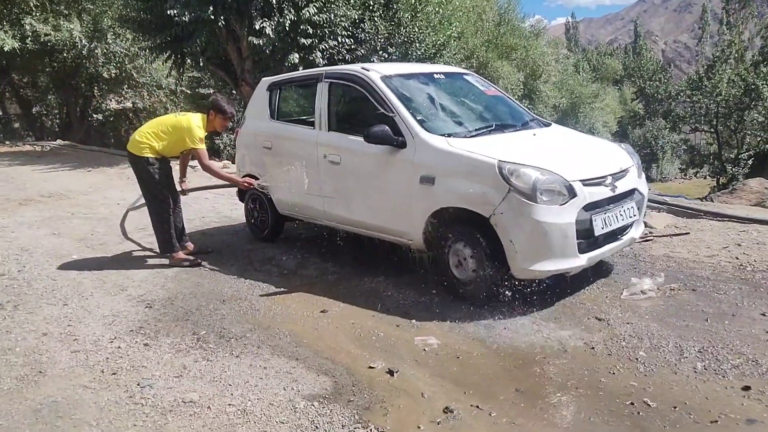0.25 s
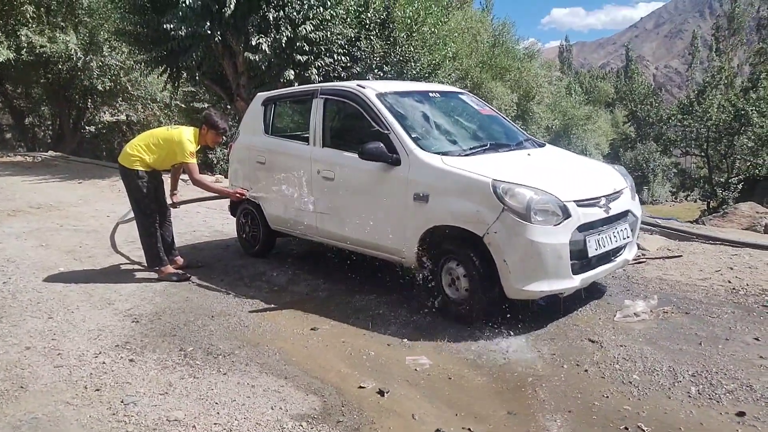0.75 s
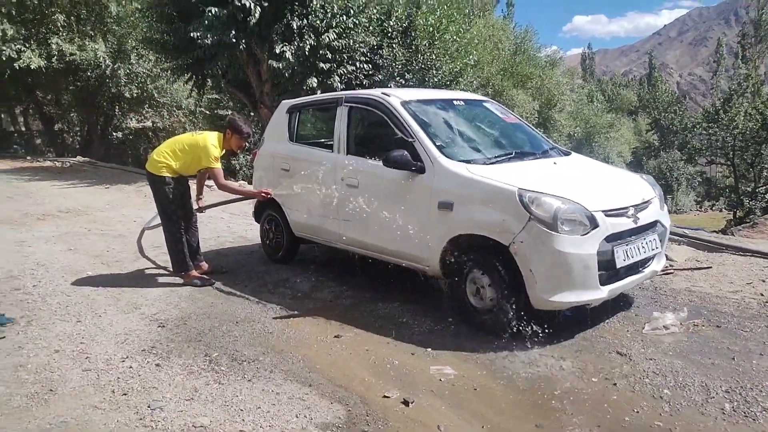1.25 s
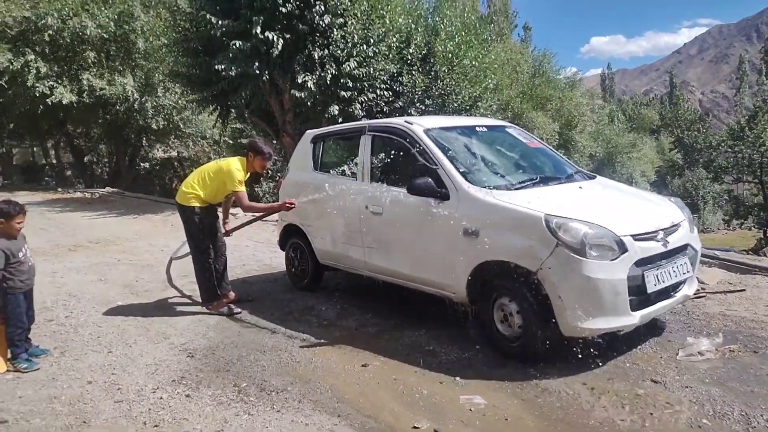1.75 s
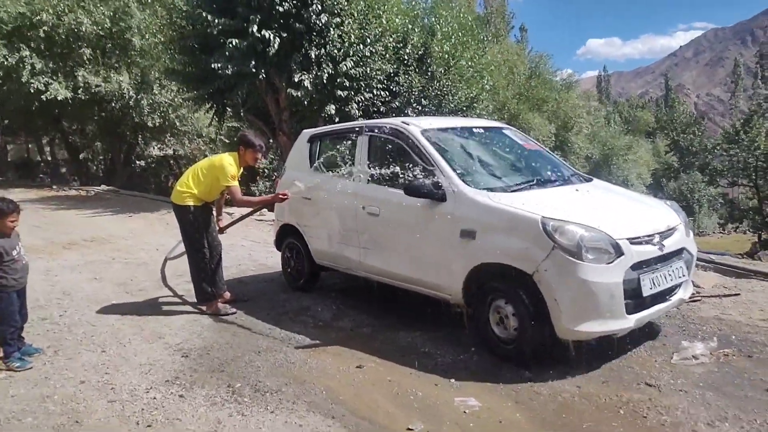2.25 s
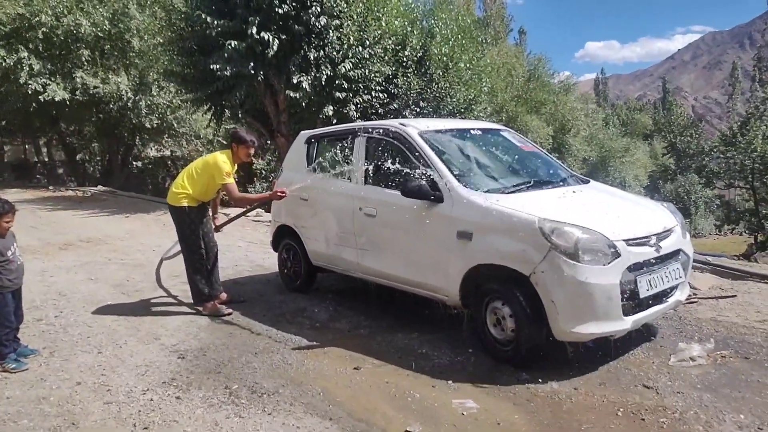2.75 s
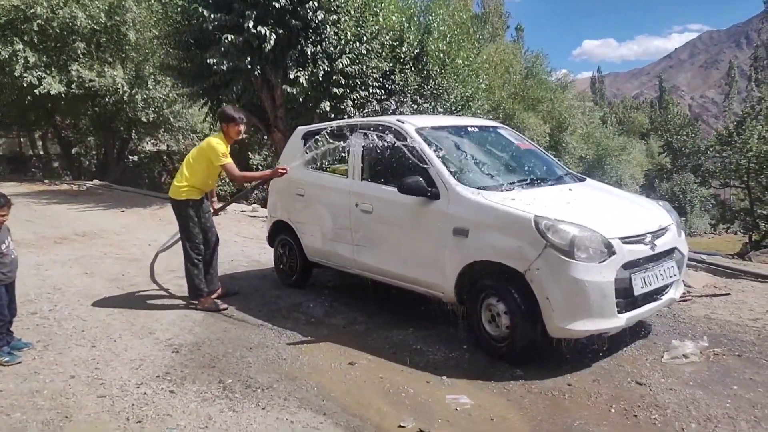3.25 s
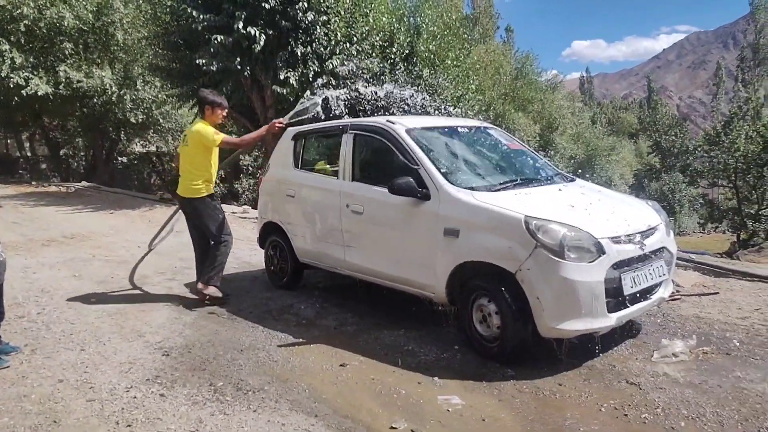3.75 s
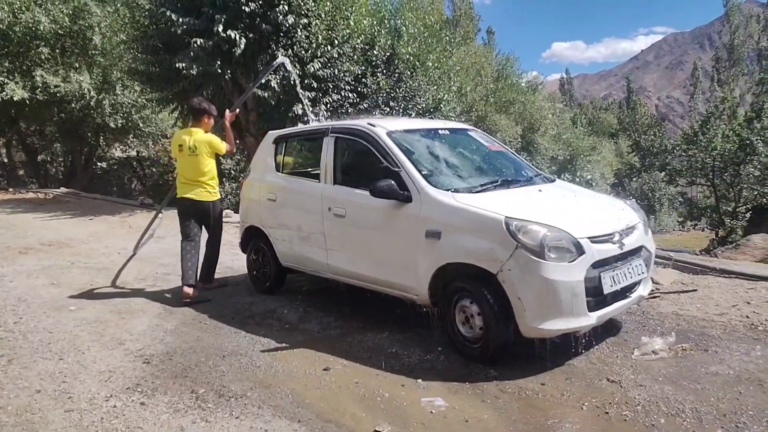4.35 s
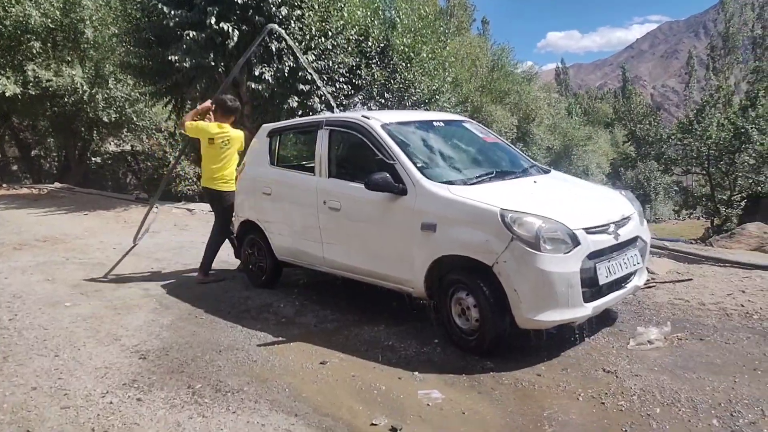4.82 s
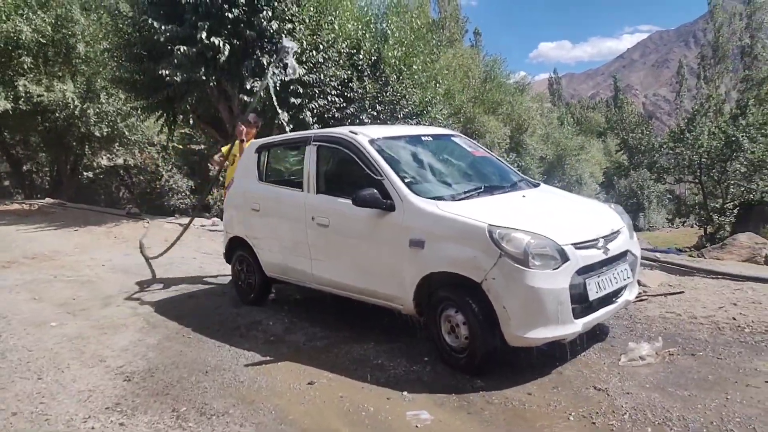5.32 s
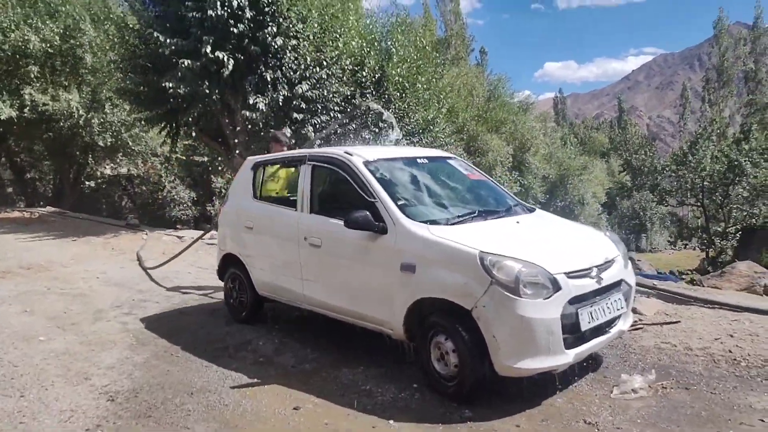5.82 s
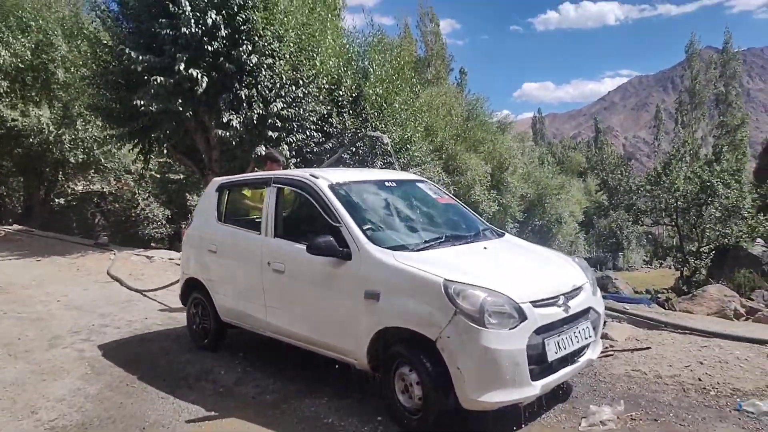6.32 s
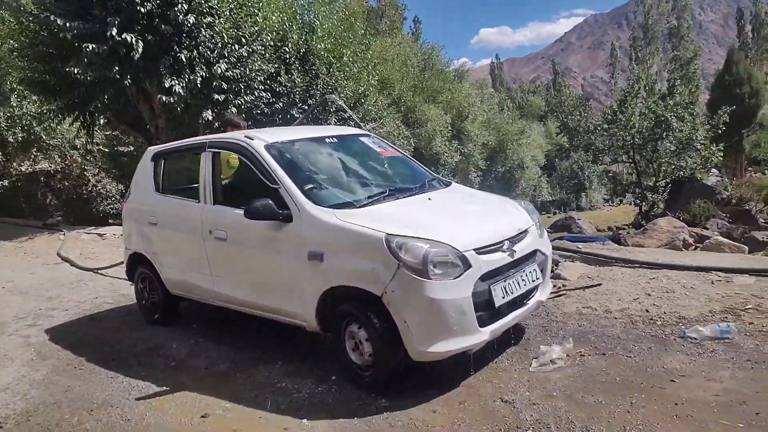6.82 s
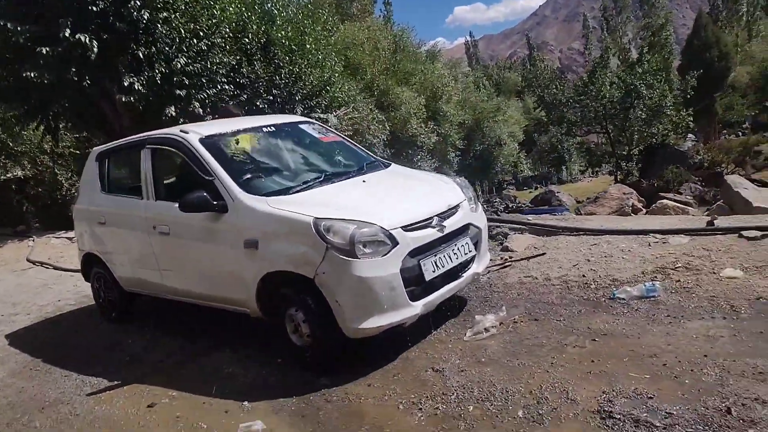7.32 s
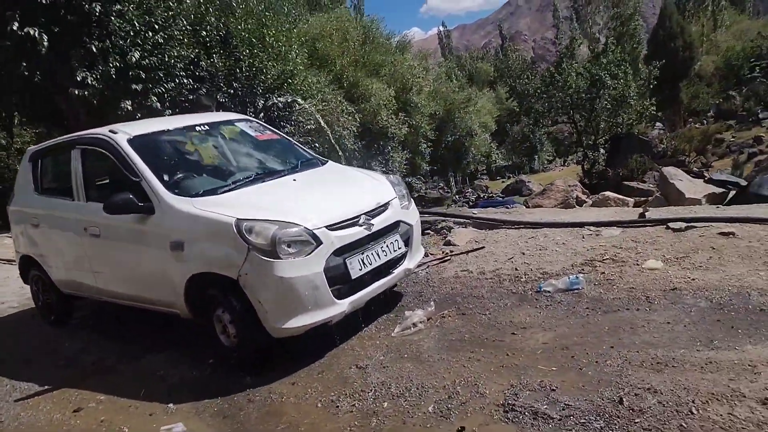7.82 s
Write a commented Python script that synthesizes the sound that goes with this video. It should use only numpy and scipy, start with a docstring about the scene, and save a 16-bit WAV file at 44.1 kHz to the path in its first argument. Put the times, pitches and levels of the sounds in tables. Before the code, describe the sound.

Water from a garden hose fizzes against a small car in a gravel yard, a few steps from the microphone and slightly to the left. In the first 0.7 seconds the jet rakes a hollow part in short rasps, while irregular splats hit the wet ground throughout. Wind buffets the microphone in low puffs, mostly on the left, with a stronger bump near 0.9 seconds. At 2 seconds a loud, sharp wind pop hits the right side, followed by brief ringing drumming on doors and glass. Spray and splatter continue, with more drumming around 4.5 seconds. From 4.7 seconds the stream lands on the roof, most strongly near 5.5 seconds. The spray then fades to light patter behind the car. Two very faint hollow tones sound around 7 seconds, and a last gust thumps on the right at about 7.2 seconds. Soft splats continue to 8 seconds.

```python
"""A garden hose plays on a small car in a gravel yard, a few steps from a phone. From the start the jet
fizzes, rakes a hollow part and drums on doors and glass, while gouts splat on the wet ground and wind
buffets each microphone port on its own. At 2 s one puff overloads the right port with a pop. From 4.7 s
the stream lands on the roof, and the spray fades as it moves behind the car. Near 7 s a faint hollow
tone sounds twice and a last gust strikes the right port."""
import sys
import numpy as np
from scipy import signal
from scipy.fft import rfft, irfft, next_fast_len
from scipy.io import wavfile
from scipy.ndimage import uniform_filter1d, map_coordinates

SR = 44100
rng = np.random.default_rng(int(sys.argv[2]) if len(sys.argv) > 2 else 0)


def generate_wav(sig):
    """Save sig (samples, or channels by samples) to the path in sys.argv[1] as 16-bit PCM at SR."""
    pcm = np.round(np.clip(np.atleast_2d(sig).T, -1, 1) * 32767).astype(np.int16)
    wavfile.write(sys.argv[1], SR, pcm)


N = 356203

# the jet sweeping the car: (time [s], fizz level [dB], mist level [dB], wash level [dB])
JET_LEVELS = [(0.0, -51.5, -59.5, -63), (0.271, -52.5, -57, -61.5), (0.5, -52, -63, -66),
              (1.01, -45.5, -57.5, -52), (1.2, -49.5, -56.5, -67), (1.48, -47.5, -57.5, -51.5),
              (1.75, -54, -61.5, -65), (2.16, -51, -61.5, -56.5), (2.54, -57.5, -63.5, -69),
              (3.21, -51, -61.5, -61), (3.65, -58, -67, -68), (3.95, -50, -64, -74),
              (4.5, -54.5, -70, -51.5), (4.85, -59.5, -78, -58.5), (5.3, -65, -80.5, -68),
              (5.68, -59, -76, -56), (6.0, -67.5, -85, -64.5), (6.34, -59, -67, -57), (6.68, -69, -81, -68),
              (7.1, -64.5, -86, -63), (7.62, -66, -81, -66.5), (7.8, -62.5, -82, -62),
              (8.08, -66, -83, -70)]
# spectrum of crackling, spattering drops: (frequency [Hz], level [dB])
SPATTER_SPECTRUM = [(900, -28), (1500, -2), (3000, 0.5), (5000, 4), (8000, -6.5), (15000, -17)]


def amp(db):
    """Decibels as an amplitude ratio."""
    return 10 ** (np.asarray(db) / 20)


def unit(x):
    """Normalisation to an rms of 1."""
    return x / np.sqrt(np.mean(x ** 2) + 1e-20)


def along(points, hz):
    """Interpolation of (frequency [Hz], value) points on a logarithmic frequency axis."""
    freqs, values = np.transpose(points)
    return np.interp(np.log(hz + 1), np.log(freqs + 1), values)


def curves(rows):
    """Linear interpolation: one value per sample for each column after the time."""
    times, *columns = np.transpose(rows)
    return [np.interp(np.arange(N) / SR, times, column) for column in columns]


def wobble(rate):
    """Smooth random modulation: a spline through rate knots a second."""
    return map_coordinates(rng.standard_normal(int(N * rate / SR) + 4), [np.arange(N) * rate / SR])


def filtered(x, response):
    """Linear filtering: the spectrum of x times a complex frequency response."""
    size = next_fast_len(N + SR // 2)
    return irfft(rfft(x, size) * response(np.fft.rfftfreq(size, 1 / SR)), size)[..., :N]


def noise(spectrum, patchy_db=0):
    """Two uncorrelated noises of one colour, rms 1, sharing random patches of gain in time and pitch."""
    pair = rng.standard_normal((2, N))
    if patchy_db:
        cells = signal.stft(pair, nperseg=256)[2]
        patches = uniform_filter1d(rng.standard_normal(cells.shape[1:]), size=8, axis=0)
        patches = uniform_filter1d(patches, size=7, axis=1)
        pair = signal.istft(cells * amp(patchy_db * unit(patches)), nperseg=256)[1][:, :N]
    return unit(filtered(pair, lambda hz: amp(along(spectrum, hz))))


def bursts(rate, spread_db, t60, count=6000):
    """Shot-noise envelope of rms 1: drops strike at random, a few much harder, and each decays."""
    gap, size = rng.exponential(1, (count, 2)).T
    onsets = (np.cumsum(gap) / rate * SR).astype(int)
    kicks = np.bincount(onsets, amp(spread_db * np.minimum(size, 3)), N)[:N]
    return unit(signal.lfilter([1], [1, -amp(-60 / (t60 * SR))], uniform_filter1d(kicks, size=50)))


def hoots():
    """Faint hollow tones with soft edges; random phase modulation blurs their pitch."""
    # the tones: (time [s], duration [s], frequency [Hz], level [dB])
    tones = [(6.85, 0.29, 1220, -74), (7.309, 0.14, 1250, -68.5)]
    out, t = np.zeros(N), np.arange(N) / SR
    waver = .0007 * wobble(60)
    for start, length, hz, db in tones:
        span = slice(round(start * SR), round((start + length) * SR))
        edge = np.abs(np.sin(np.pi * (t[span] - start) / length)) ** .5
        out[span] += amp(db) * edge * np.sin(2 * np.pi * hz * (t[span] + waver[span] / (2 * np.pi)))
    return np.sqrt(2) * out * amp([[-2.5], [2.5]])


def wind():
    """Turbulence: lumpy low-frequency pressure fluctuations, uncorrelated between the ports."""
    # gusts at the phone: (time [s], level [dB], left minus right [dB])
    gusts = [(0.0, -70, -4), (0.42, -54, 1), (0.65, -63, 6), (0.91, -49, 7), (1.22, -68, 11),
             (2.0, -78, -13), (2.12, -63, -7), (2.65, -83.5, -5), (3.2, -53, 16), (3.45, -62, 2.5),
             (4.03, -56.5, 13), (4.16, -67, 12), (4.62, -54.5, 8), (5.0, -65, 1), (5.25, -74.5, -19),
             (5.7, -57, 5), (5.92, -61, -27), (6.15, -61.5, -12), (7.1, -80, -11), (7.27, -48.5, -31),
             (7.43, -53.5, -17), (7.63, -67.5, -6), (8.08, -68, -10)]
    # spectrum of the buffeting: (frequency [Hz], level [dB])
    buffet = [(20, -69.5), (50, -8), (85, 2), (130, -6.5), (200, -12), (500, -53)]
    db, pan_db = curves(gusts)
    left_share = 1 / (1 + amp(-2 * pan_db))
    pan = np.sqrt([left_share, 1 - left_share])
    lumps = amp(4.6 * np.array([wobble(22), wobble(22)]) + 2.26 * np.array([wobble(8.6), wobble(7)]))
    return 2 * np.sqrt(2) * amp(db) * pan * unit(lumps * noise(buffet))


def puffs(hz=105, rise_s=0.0027, fall_s=0.013):
    """Damped oscillation: each eddy pushes one membrane, which swings out in two or three cycles."""
    # the strongest eddies: (time [s], level [dB], port [0 left, 1 right])
    eddies = [(0.475, -34.5, 0), (0.516, -30.5, 0), (0.594, -26.5, 0), (0.622, -29.5, 0), (0.667, -32, 0),
              (0.79, -34.5, 1), (0.916, -17.5, 0), (0.957, -30, 0), (1.345, -38, 0), (2.87, -37.5, 0),
              (3.155, -32.5, 0), (3.96, -37.5, 0), (4.047, -33.5, 0), (5.907, -36.5, 1), (5.986, -37, 1),
              (6.343, -37, 0), (6.506, -42.5, 1), (7.171, -20, 1), (7.316, -33.5, 1), (7.337, -32, 1),
              (7.354, -32.5, 1), (7.382, -33.5, 1)]
    out, t = np.zeros((2, N)), np.arange(-SR // 40, SR // 12) / SR
    envelope = np.where(t < 0, np.exp(-(t / rise_s) ** 2), np.exp(-(np.abs(t) / fall_s) ** 1.64))
    tip = 1.03 / (1 + (t / 0.00046) ** 2)  # sharp spike, on the windward right port only
    for time, db, port in eddies:
        port, onset = round(port), round(time * SR) - SR // 40
        swing = np.cos(2 * np.pi * hz * np.exp(rng.normal(0, 0.049)) * t - .4)
        out[port, onset:][:len(t)] += amp(db) * (envelope * swing + port * tip)
    return out


def pop(draw_s=0.0027, flick_hz=420):
    """Overload: a puff draws the right membrane back; it snaps over and swings out ever slower."""
    # the overloading puff: (time of the snap [s], level [dB], starting frequency [Hz], fall time [s])
    overload = (2.0460, -.3, 135, .0165)
    time, db, hz, fall_s = overload
    t = np.arange(N) / SR - time
    age = np.maximum(t, 0)
    snap = (1 + np.tanh((t - .0003) / .0002)) / 2
    pull = -.33 * np.exp(-((t + 0.0023) / draw_s) ** 2) * (1 - snap)
    flick = .5 * np.sin(2 * np.pi * flick_hz * age) * np.exp(-age / 0.0026)
    decay = .9 * np.exp(-(age / fall_s) ** 1.8) + .07 * np.exp(-age / .025)
    swing = decay * np.cos(2 * np.pi * hz * age / (1 + 24 * age) - 1.6)
    return amp(db) * (pull + snap * (swing + flick)) * (age < .15) * [[0], [1]]


def ports(pair, left_lead_s=0.00011):
    """Coherence, shadowing and delay turn two uncorrelated signals of a source into left and right."""
    # likeness of the ports, greatest in the bass: (frequency [Hz], correlation [ratio])
    coherence = [(200, 1), (500, 0.92), (1000, 0.57), (2000, 0.12), (4000, 0.045), (8000, 0.13),
                 (15000, .05)]
    # acoustic shadow of the phone's body: (frequency [Hz], left minus right [dB])
    shadow = [(60, -22), (120, 1), (240, 0), (480, 1), (950, 0), (1890, 5), (3770, 7), (7520, 9.5),
              (15000, -6)]
    angle = lambda hz: np.arccos(np.clip(along(coherence, hz), -1, 1)) / 2
    mid, side = filtered(pair, lambda hz: np.array([np.cos(angle(hz)), np.sin(angle(hz))]))
    left = lambda hz: amp(along(shadow, hz) / 2) * np.exp(1j * np.pi * hz * left_lead_s)
    return filtered(np.array([mid + side, mid - side]), lambda hz: np.array([left(hz), 1 / left(hz)]))


def gushes(events, spectrum, fall_s):
    """Amplitude-modulated noise: a rasp that starts quickly, holds and decays exponentially."""
    t = np.arange(N) / SR
    gate = np.zeros(N)
    for start, length, db in events:
        attack = np.clip((t - start) / (.07 * length), 0, 1)
        gate += amp(db) * attack * np.exp(-np.maximum(t - start - length, 0) / fall_s)
    return gate * noise(spectrum) * unit(1 + .6 * bursts(150, 3.5, .02))


def roof():
    """Plate vibration: the falling stream drives the low modes of the roof."""
    # the stream landing: (time [s], duration [s], level [dB])
    landings = [(4.74, 0.082, -49), (4.9, 0.02, -49), (5.12, 0.046, -54.5), (5.53, 0.027, -43.5),
                (5.556, 0.037, -39), (5.69, 0.033, -47.5), (6.15, .05, -65)]
    # spectrum of the struck roof: (frequency [Hz], level [dB])
    spectrum = [(40, -29), (95, 5), (200, -13), (374, -7), (529, -12), (707, -11), (1390, -15),
                (1920, -21.5), (2720, -16.5), (3570, -34), (7800, -57)]
    return gushes(landings, spectrum, fall_s=0.03)


def hollow():
    """Cavity resonance: a wheel arch or sill colours the rasp of the jet that rakes it."""
    # passes of the jet: (time [s], duration [s], level [dB])
    rakes = [(0.055, 0.072, -36), (.155, 0.066, -37.5), (0.419, 0.031, -38), (.469, 0.014, -44),
             (0.503, 0.022, -49), (0.651, 0.032, -39), (3.876, 0.058, -60)]
    # spectrum of the hollow part: (frequency [Hz], level [dB])
    spectrum = [(110, -27), (180, -2.5), (339, 0), (465, -80), (627, -2.5), (800, -5), (972, 3.5),
                (1200, -8.5), (1680, -10.5), (2110, -4.5), (3830, -11), (4260, -2.5), (4730, -11),
                (5940, -13), (12000, -24.5), (15600, -45), (22000, -120)]
    return gushes(rakes, spectrum, fall_s=0.0082)


def panels(width_hz=125):
    """Forced vibration: a door or window rings at a pitch set by the impact point; the roof booms."""
    # drumming under the jet: (time [s], ring level [dB], ring frequency [Hz], boom level [dB])
    drumming = [(0.0, -63.5, 678, -63.5), (0.45, -67.5, 681.4, -62), (1.79, -63.5, 634, -68.5),
                (2.02, -52, 608, -68.5), (2.11, -40, 540, -55.5), (2.3, -55, 499.7, -66),
                (2.6, -57, 579.7, -65.5), (3.2, -60, 618.4, -61.5), (3.7, -64, 559, -60.5),
                (4.1, -61, 623, -54), (4.5, -46, 619, -42), (4.63, -53, 602, -41.5),
                (4.73, -64.5, 613, -58.5), (5.05, -60.5, 564.7, -61.5), (5.15, -56, 558, -55),
                (5.49, -66, 583, -68.5), (5.564, -37.5, 526, -45.5), (6.05, -75.5, 576, -62),
                (6.234, -61.5, 533, -73.5), (7.05, -80, 558, -67.5), (7.3, -74, 558, -65.5),
                (8.08, -95, 600, -69)]
    # spectrum of the boom: (frequency [Hz], level [dB])
    boom = [(50, -25), (90, 3), (180, 1), (300, 3.5), (500, -5.5), (800, -3.5), (1300, -36.5)]
    ring_db, ring_hz, boom_db = curves(drumming)
    shake = filtered(rng.standard_normal((2, 2, N)), lambda hz: 1 / (1 + (2 * hz / width_hz) ** 2))
    phase = 2 * np.pi * np.cumsum(ring_hz) / SR
    ring = unit(shake[0] * np.cos(phase) + shake[1] * np.sin(phase))  # a narrow band around ring_hz
    impacts = unit(1 + .5 * bursts(100, 4, 0.056))
    return impacts * (amp(ring_db) * ring + amp(boom_db) * noise(boom))


def small_gouts(count=40, per_s=5, over_fizz_db=8.5, centre_hz=1994, spatter_db=-0.5):
    """Jittered impacts: rows for splats(), their level following the fizz."""
    jitter, size, tone = rng.uniform(0, 1, (count, 3)).T
    times = (np.arange(count) + jitter) / per_s
    jet_times, fizz_db = np.transpose(JET_LEVELS)[:2]
    db = np.interp(times, jet_times, fizz_db) + over_fizz_db + 6 * (size - .5)
    rows = np.transpose([times, db, centre_hz * np.exp(tone - .5), np.full(count, spatter_db)])
    return rows[times < N / SR]


def splats(plops=14, plop_t60=0.032, spatter_t60=0.022, smear_s=0.002495):
    """Impact transients: each gout lands as a cluster of damped sinusoids and a spatter of noise."""
    # larger gouts: (time [s], level [dB], plop frequency [Hz], spatter relative to plop [dB])
    large_gouts = [(0.029, -40, 2560, -13), (0.4145, -22.5, 990, -32), (0.4683, -28, 2050, -34),
                   (0.6106, -45.5, 2970, 17), (0.6521, -26.5, 992, -12), (0.9413, -28, 1510, -7),
                   (1.1443, -25, 2810, -16), (1.179, -30, 1238, -9), (1.3845, -26.5, 2294, -13),
                   (1.5813, -28.5, 3040, -5.5), (2.1832, -34, 2380, -7), (2.2904, -28.5, 1430, -8.5),
                   (2.3238, -51, 3000, 9), (2.6307, -35.5, 2180, 0.5), (2.814, -39.5, 3420, 4),
                   (3.0053, -36.5, 1470, -4.5), (3.0773, -32.5, 3520, -1.5), (3.6543, -29, 1287, -6.5),
                   (3.722, -30, 1300, -9), (3.7843, -42, 2610, 4), (3.9001, -35, 3060, 0.5),
                   (3.981, -31.5, 2334, -3), (4.0405, -37.5, 1790, -3), (4.0523, -30.5, 2880, -10),
                   (4.114, -44, 2350, -5), (4.2442, -33.5, 3250, -10), (4.3271, -46, 1460, 11.5),
                   (4.3895, -39, 880, 0), (4.4205, -28, 2110, -6), (4.4334, -25, 2373, -14),
                   (4.547, -35.5, 3340, -9), (4.6033, -37, 1590, -1.5), (4.6435, -34, 1560, 0.5),
                   (4.7696, -38.5, 910, -7), (4.812, -34.5, 1680, -16), (6.0182, -38.5, 1071, -21),
                   (6.303, -41.5, 1500, -12), (6.6171, -43, 1530, -11.5), (6.8164, -46.5, 1270, -16),
                   (6.8504, -43, 1150, -10), (7.1154, -36.5, 1200, -20), (7.3885, -48, 1220, -17),
                   (7.663, -36.5, 1212, -25), (7.7025, -41, 2106, -12), (7.7696, -37, 2050, -23),
                   (7.8004, -43, 2650, -24), (8.0237, -37.5, 1020, -17)]
    out, t = np.zeros((2, N + SR)), np.arange(SR // 15) / SR
    spatter_noise = noise(SPATTER_SPECTRUM, patchy_db=2)
    spatter_envelope = amp(-60 * t / spatter_t60) * (1 - np.exp(-t / 0.00061))
    for time, db, hz, spatter_db in [*large_gouts, *small_gouts()]:
        onset = round(time * SR)
        pitch = hz * np.exp(rng.normal(0, .4, (plops, 1)))
        phase = rng.uniform(0, 2 * np.pi, (2, plops, 1))
        age = np.maximum(t - smear_s * rng.uniform(0, 1, (plops, 1)) ** 2, 0)
        envelope = amp(-60 * age / plop_t60) * (1 - np.exp(-age / 0.00097))
        plop = (envelope * np.sin(2 * np.pi * pitch * age + phase)).sum(1) / np.sqrt(plops)
        spatter = spatter_noise[:, onset % (N - len(t)):][:, :len(t)] * spatter_envelope
        out[:, onset:onset + len(t)] += amp(db) * (plop + amp(spatter_db) * spatter)
    return out[:, :N]


def jet():
    """Superposed impacts: small drops merge into fizz, mist and wash; larger ones patter and crackle."""
    # spectra of fine spray, wash off the bodywork and larger drops: (frequency [Hz], level [dB])
    fizz_spectrum = [(940, -43.5), (1600, -5.5), (1810, -1), (2040, -6.5), (2910, 1), (3280, 0.5),
                     (5280, -1), (11000, -14.5), (14300, -57), (22000, -120)]
    wash_spectrum = [(400, -32.5), (700, -8.5), (1500, -3), (2700, -12.5), (4200, -49.5)]
    patter_spectrum = [(900, -6), (1500, -0.5), (3000, 8), (5000, -6), (8000, -8), (14000, -42)]
    # high hiss of mist, brightened near 15 kHz by the microphone's resonance:
    # (frequency [Hz], level [dB])
    hiss_spectrum = [(6000, -37), (9000, 4.5), (12500, 3.5), (14000, 4.5), (15300, 7.5), (16500, -13.5)]
    # bodywork resonances: (frequency [Hz], bandwidth [Hz], level [dB])
    modes = [(1150, 200, -3.5), (1460, 31, -4), (2300, 49, 0), (2755, 540, 10.5)]
    fizz_db, mist_db, wash_db = curves(JET_LEVELS)
    surge_db = 0.47 * wobble(6) + 1.24 * wobble(12) + 1.1 * wobble(35)
    fizz = noise(fizz_spectrum, patchy_db=2.5) * unit(1 + 0.35 * bursts(400, 2.2, 0.012))
    mist = noise(hiss_spectrum, patchy_db=1.5) * unit(1 + .5 * bursts(300, 9.5, 0.0068))
    bodywork = lambda hz: 1 + 0.65 * sum(amp(db) / (1 + ((hz - centre) / (width / 2)) ** 2)
                                         for centre, width, db in modes)
    wash = noise(wash_spectrum, patchy_db=3.0) * (1 + 0.31 * bursts(120, 7.1, 0.099))
    wash = unit(filtered(wash, bodywork))
    patter = noise(patter_spectrum, patchy_db=5) * bursts(90, 5.4, 0.03)
    crackle = noise(SPATTER_SPECTRUM, patchy_db=7) * bursts(60, 7.5, 0.004)
    spray = amp(fizz_db) * (amp(-1.0) * fizz + amp(-5.0) * patter)
    spray += amp(mist_db) * (mist + amp(2.5) * crackle)
    return amp(surge_db) * (spray + amp(wash_db) * wash)


def scene():
    """Superposition: the water as the two ports hear it, the faint tones and the wind on the phone."""
    water = jet() + hollow() + roof() + panels() + splats()
    return ports(water) + hoots() + wind() + puffs() + pop()


def record(dry, low_hz=26, top_hz=15830):
    """Nonlinearity and band limiting: deep inward swings crackle, peaks round off, band edges are cut."""
    crackle = noise([(2000, -8.5), (3800, 3), (6000, -6.5), (10000, -27.5)])
    rough = dry + 0.25 * np.maximum(-dry - .45, 0) * crackle
    rounded = rough / (1 + np.abs(rough / 1.1) ** 5) ** (1 / 5)
    return filtered(rounded, lambda hz: (hz < top_hz) * hz ** 4 / (hz ** 4 + low_hz ** 4))


dry = scene()
out = record(dry)
generate_wav(out)
```